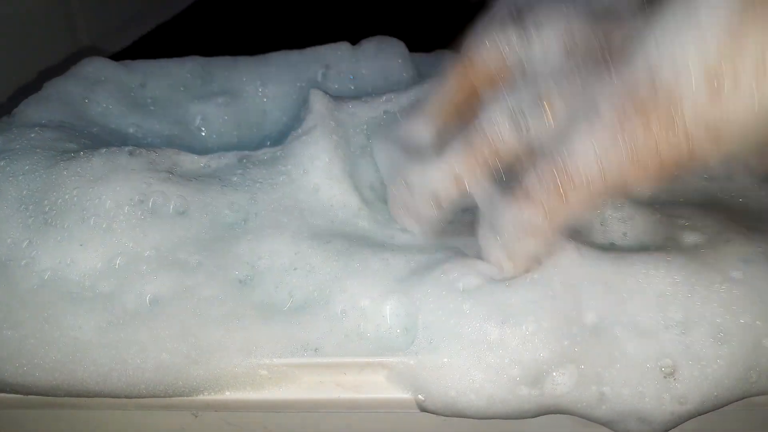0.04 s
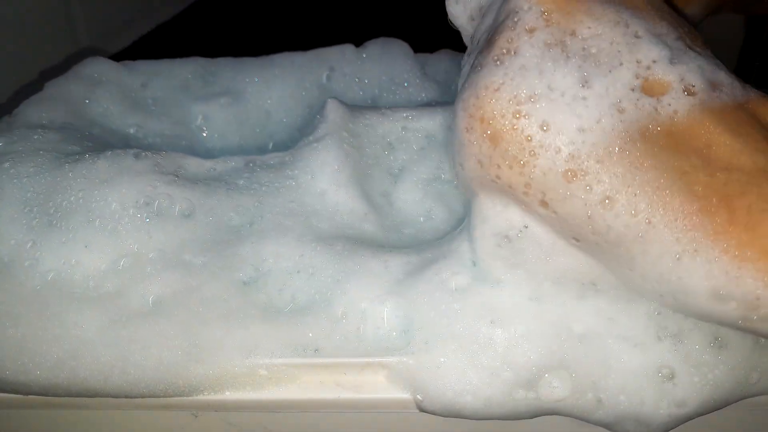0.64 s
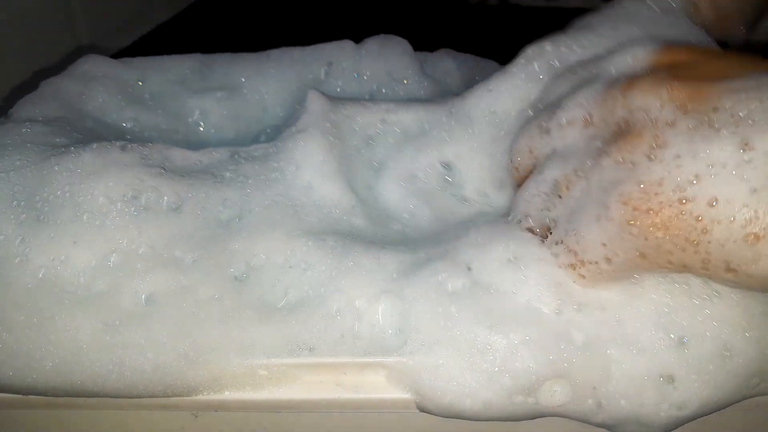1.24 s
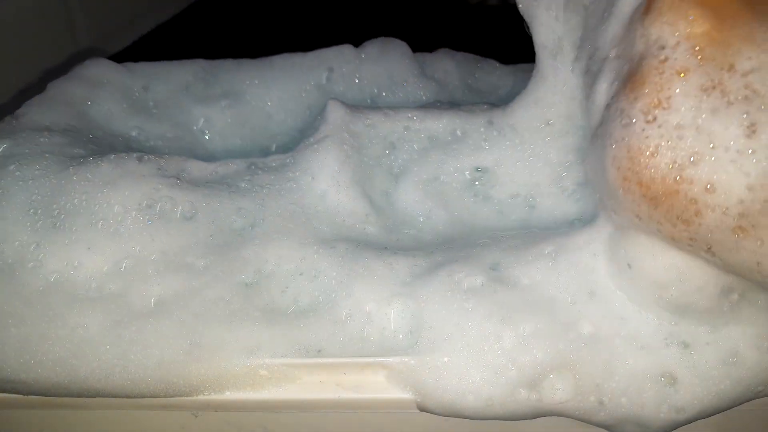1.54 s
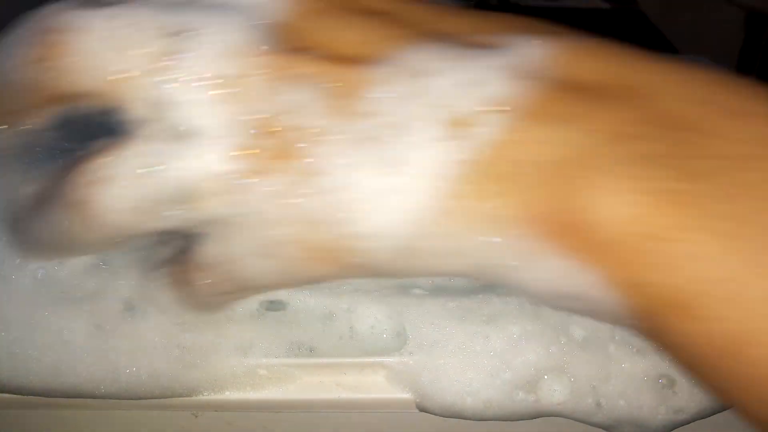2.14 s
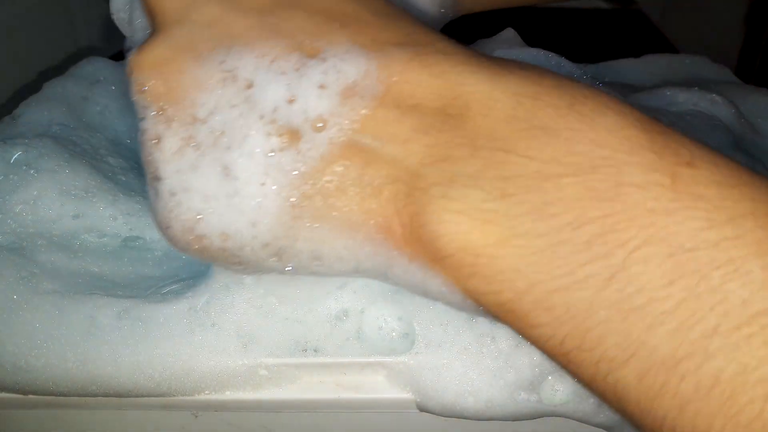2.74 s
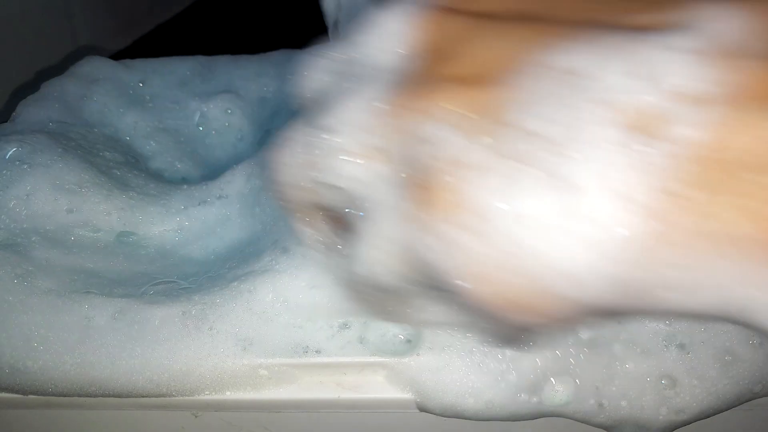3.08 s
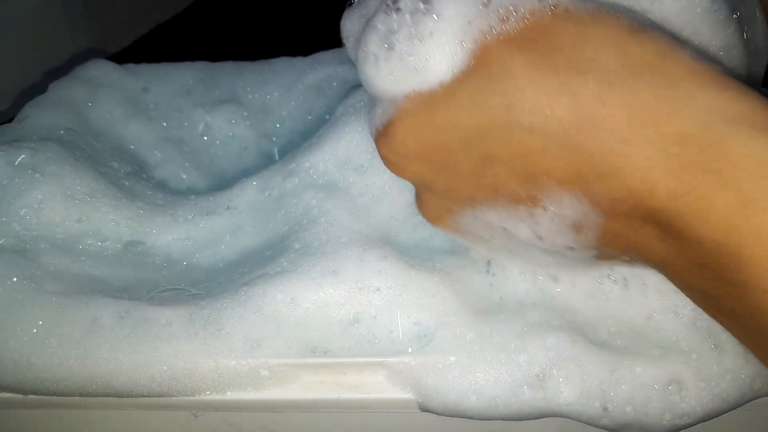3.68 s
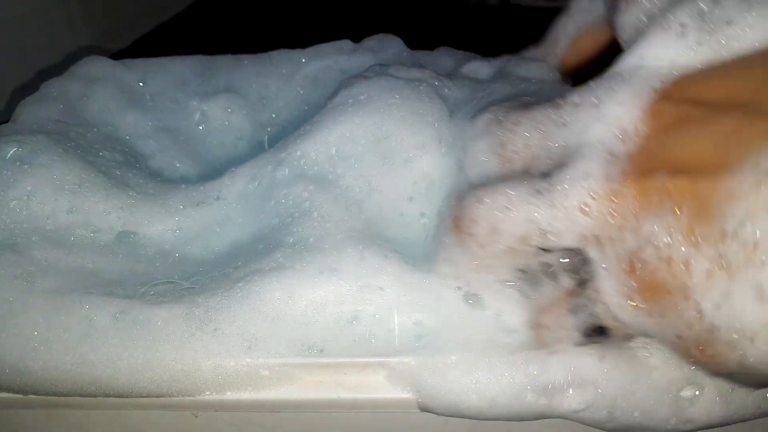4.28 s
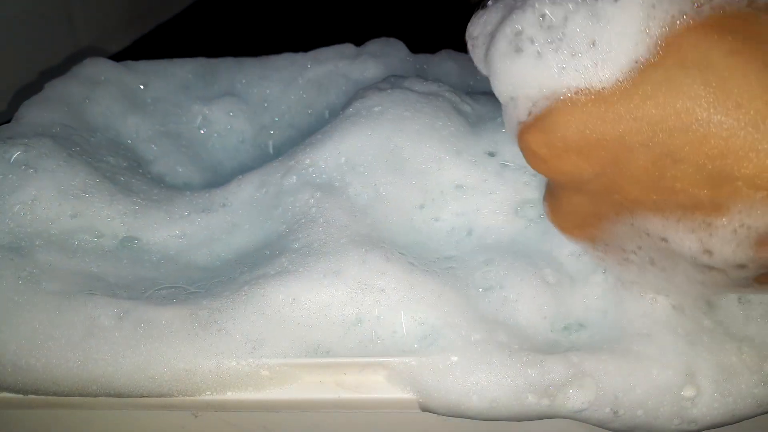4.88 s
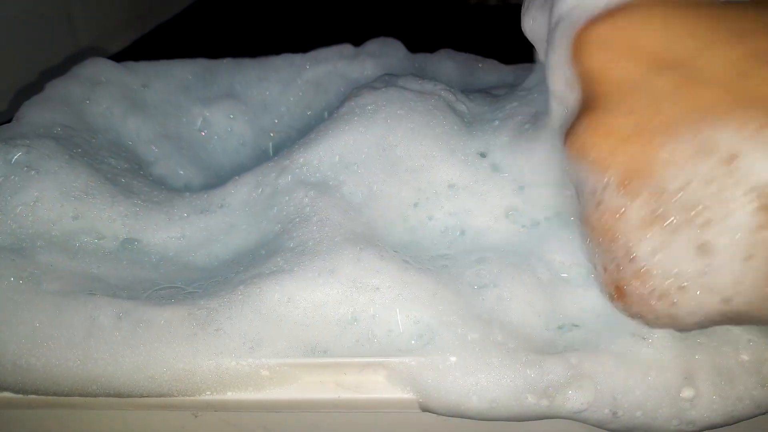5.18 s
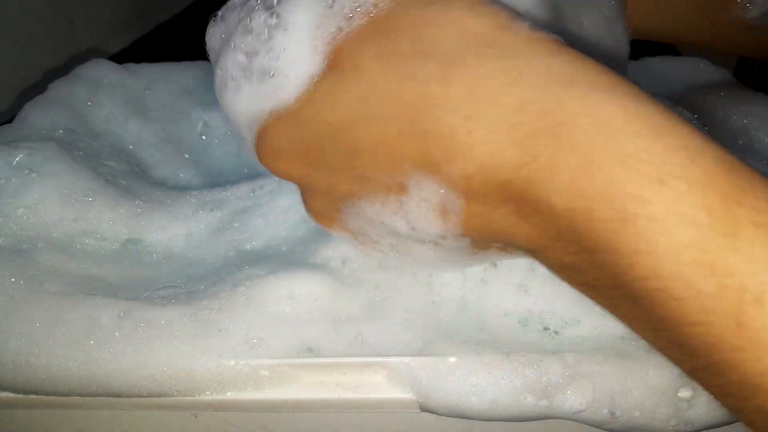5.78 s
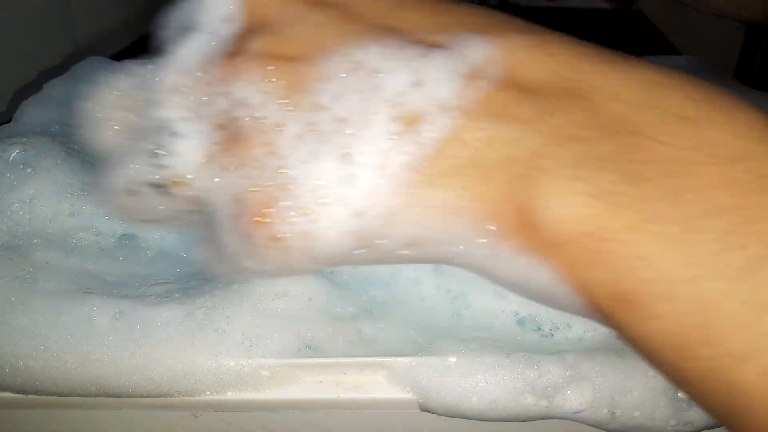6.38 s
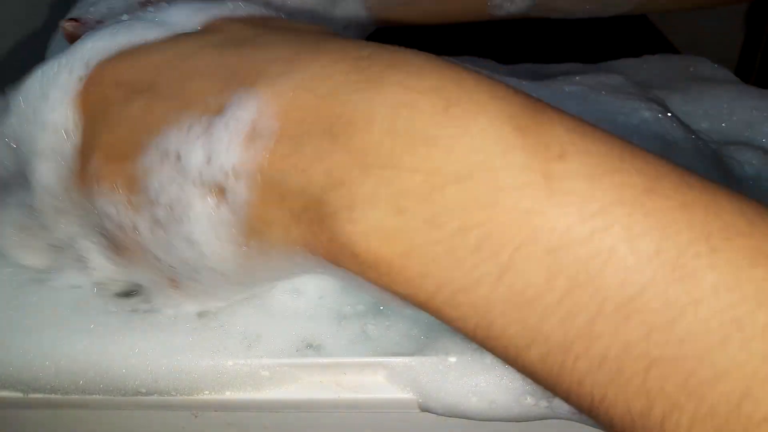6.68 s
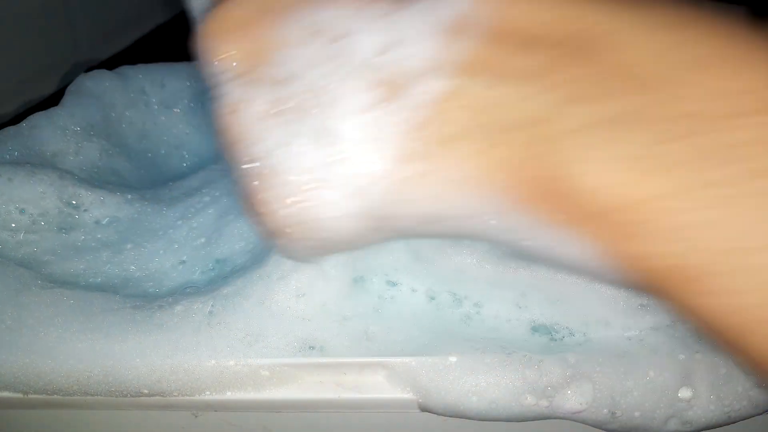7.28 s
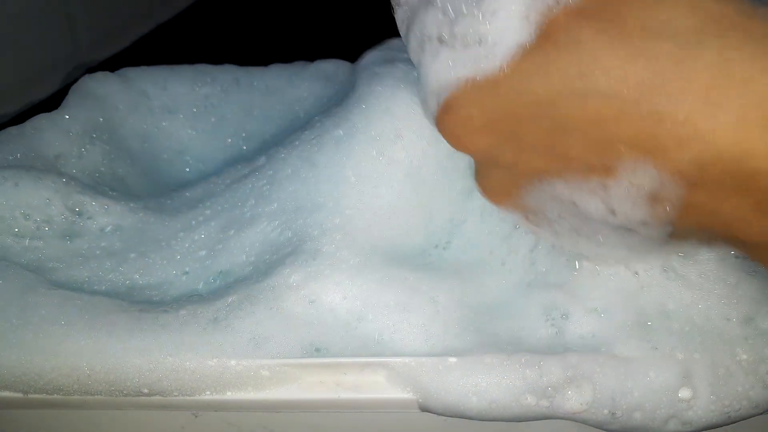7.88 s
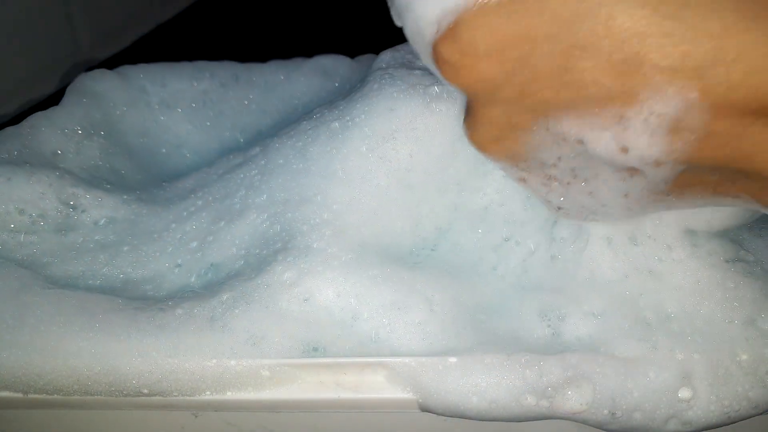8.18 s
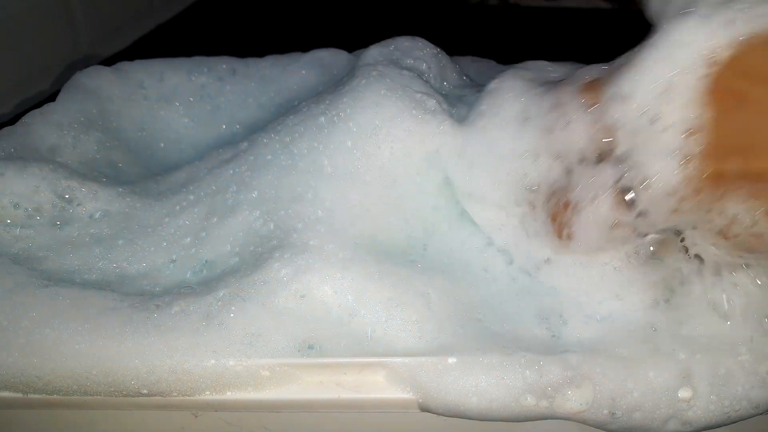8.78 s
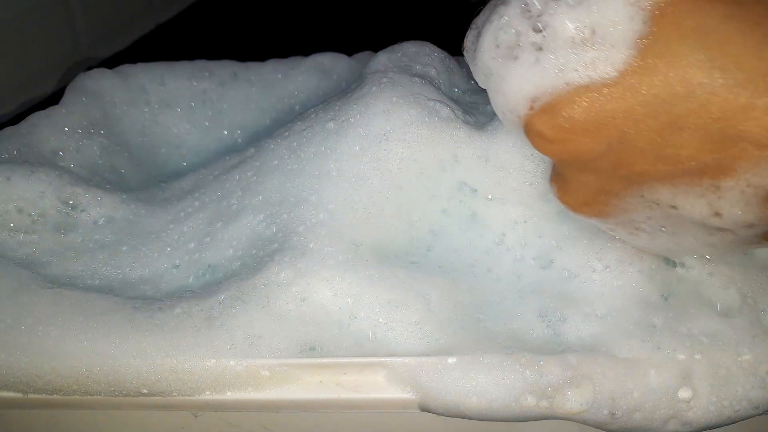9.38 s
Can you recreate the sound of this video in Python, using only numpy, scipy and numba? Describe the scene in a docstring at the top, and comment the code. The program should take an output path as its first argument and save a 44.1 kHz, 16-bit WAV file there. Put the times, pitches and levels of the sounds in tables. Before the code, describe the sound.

Close, wet squelches and sucking slurps alternate as a fist repeatedly squishes soap foam in a small quiet room.

```python
"""A faint fizz of soap foam in a small quiet room, then nine wet squeezes of a hand close to a phone.
In each squeeze big air pockets gurgle out, then ever finer bubbles spit between the fingers.
Between squeezes the fist reopens with a slurp and scoops more foam from a tray.
Every bubble is a tiny ringing tone that rises as it dies away; thousands together make the squelch.
Underneath, the moving arm rumbles and the room has a low hum."""
import sys
import numpy as np
from scipy import signal
from scipy.fft import rfft, irfft, next_fast_len
from scipy.io import wavfile
from scipy.ndimage import uniform_filter1d
from numba import njit

SR = 44100
rng = np.random.default_rng(int(sys.argv[2]) if len(sys.argv) > 2 else 0)


def dump_mix(stems):
    """Bounce the given channels to the path in sys.argv[1] as a 16-bit WAV at rate SR."""
    frames = np.atleast_2d(stems).T  # one column per channel
    limited = np.clip(frames, -1, 1)  # hard clip at full scale
    pcm = np.round(limited * 32767).astype(np.int16)
    wavfile.write(sys.argv[1], SR, pcm)


N = 424683
TIME = np.arange(N) / SR


# Each closing of the fist. Levels in all tables are relative: 0 dB is not a fixed loudness.
# (start [s], time to full flow [s], time to full pressure [s], time until it eases [s], fade [dB/s],
#  first trickle against full flow [dB], bursts [dB], air pockets [dB], spray [dB], arm rumble [dB])
SQUEEZES = [ (0.583, 0.075, 0.11, 0.17, 320, -16.5, -43.5, -42, -62.5, -59),
            (1.581, 0.021, 0.067, 0.18, 378, -10, -40, -41, -52.5, -73),
            (2.716, 0.053, .14, 0.18, 320, -7, -44.5, -47, -50, -86),
            (3.746, 0.11, 0.22, 0.23, 415, -8, -43, -42, -51.5, -84),
            (4.851, 0.082, 0.19, 0.26, 646, -22.5, -44, -42.5, -49.5, -64.5),
            (5.958, 0.047, 0.25, 0.25, 450, -17, -44.5, -44.5, -47.5, -58),
            (7.024, 0.064, 0.24, 0.19, 400, -17.5, -41, -44, -41.5, -65),
            (8.042, 0.046, 0.15, 0.21, 451, -18.5, -43.5, -43, -49, -67),
            (9.153, 0.034, 0.12, 0.26, 72, -16, -45.5, -47.5, -47.5, -64.5)]
def squeezes(pockets_last_s=0.067, drain_db_per_s=85.5, spray_climb_db=54):
    """Foam gives way in the fist: pockets gurgle and drain, then rising pressure drives a fine spray."""
    burst, pocket, spray = np.zeros((3, N))
    for start, rise_s, tight_s, ease_s, fade, trickle_db, burst_db, pocket_db, spray_db, _ in SQUEEZES:
        touch = undb(-26) * swell(start, width_s=0.06)  # the fingers first meet the foam softly
        flow = touch + stroke(start, rise_s, ease_s, trickle_db, fade, swell_s=0.005)
        slack = 1 - np.clip((TIME - start) / tight_s, 0, 1)
        drained_db = np.clip(-drain_db_per_s * (TIME - start - pockets_last_s), -13.5, 0)
        burst += flow * undb(burst_db)
        pocket += flow * undb(pocket_db + drained_db)
        spray += flow ** 0.94 * undb(spray_db - spray_climb_db * slack ** 1.84)
    between = burst * (spray / (burst + 1e-9)) ** 0.57  # middle-sized bubbles follow a blend of both
    finest = spray * (spray / spray.max()) ** 0.22  # the finest films tear mostly at full pressure
    gurgle = undb(3) * pocket * bubbles(2400, 370, 660, cycles=5, spread_db=-0.5, lag_cycles=0.099)
    glug = undb(-4.5) * pocket * bubbles(1200, 118, 313, cycles=6.2, spread_db=-4, lag_cycles=0.02)
    squelch = undb(-1) * burst * bubbles(15000, 745, 2350, cycles=4.1, spread_db=2)
    crackle = undb(5) * between * bubbles(24000, 2190, 4800, cycles=13, spread_db=2)
    hiss = undb(6) * spray * bubbles(36000, 4180, 8550, cycles=6.7, spread_db=4.5)
    mist = undb(4) * finest * bubbles(44000, 8100, 15400, cycles=4.4, spread_db=5.5)
    sputter = undb(2.6 * wander(per_s=110))  # the finger gaps open and seal
    fits = undb(0.5 * wander(per_s=150) - 2)  # the foam gives way in quick fits
    return (gurgle + glug + squelch + crackle + (hiss + mist) * sputter) * fits


# Each reopening of the fist: (start [s], peeling time [s], time held open [s], wet smack [dB],
#  hollow gulp [dB], tearing films [dB], fizz of the next scoop [dB])
SLURPS = [ (0.869, .044, 0.0026, -42, -37.5, -44.5, -112), (1.884, 0.0055, 0.039, -43, -43.5, -52.5, -77.5),
          (3.006, 0.033, 0.0076, -42.5, -39.5, -34.5, -85), (4.094, 0.026, 0.025, -40.5, -38, -42, -111),
          (5.203, 0.03, 0.033, -47, -43, -48.5, -99), (6.325, 0.012, .054, -42.5, -42.5, -45, -91),
          (7.34, 0.019, 0.025, -36.5, -40.5, -37.5, -101), (8.38, 0.031, 0.032, -43, -43.5, -40, -95)]
def slurps(gulp_lag_s=0.0015, thud_lag_s=0.015):
    """Fingers peel off the wet palm: soap films smack apart, then air gulps into the widening hollow."""
    smack, gulp, tear = np.zeros((3, N))
    for start, rise_s, hold_s, smack_db, gulp_db, tear_db, _ in SLURPS:
        ease_s = rise_s + hold_s
        pull = stroke(start, rise_s, ease_s, start_db=-18, fade_db_per_s=513.5, swell_s=0.0029)
        inrush = stroke(start + gulp_lag_s, rise_s, ease_s, start_db=-17.5, fade_db_per_s=478)
        smack += undb(smack_db) * pull
        tear += undb(tear_db) * pull ** 0.82  # the harder the pull, the more small films tear
        gulp += undb(gulp_db) * inrush
    late_gulp = np.roll(gulp, int(thud_lag_s * SR))  # the hollow widens, so deep bubbles come last
    hollow = undb(1) * gulp * bubbles(4500, 438, 836, cycles=7.2, spread_db=4, lag_cycles=0.19)
    thud = undb(-2.5) * late_gulp * bubbles(1800, 112.4, 311, 4.2, spread_db=-0.5, lag_cycles=0.047)
    suck = undb(0.5) * smack * bubbles(8000, 658, 1580, cycles=6.3, spread_db=1.5)
    films = undb(-6.5) * tear * bubbles(14000, 1630, 3330, cycles=4.5, spread_db=2.5)
    spit = undb(-12.5) * tear * bubbles(24000, 3250, 9900, cycles=1.2, spread_db=6.5)
    flicker = undb(1.5 - 1.43 * wander(per_s=200))
    return (hollow + thud + suck + films + spit) * flicker


# Single air pockets that pop: (time [s], level [dB], pitch [Hz])
POCKET_POPS = [(0.67, -22, 604), (1.596, -29, 380), (1.641, -17, 403), (1.913, -27, 460), (1.951, -44, 910),
               (2.72, -32, 600), (3.044, -17, 745), (3.752, -30, 384), (3.822, -39, 460), (4.936, -20, 500),
               (5.249, -22, 470), (5.957, -29, 372), (5.995, -30, 484), (6.082, -21.5, 730),
               (6.356, -18, 660), (6.394, -15, 763), (7.367, -18, 613), (7.381, -21, 890),
               (8.064, -22.5, 340), (8.447, -16, 600), (9.181, -32, 468), (9.217, -26.5, 360)]
def pops():
    """Big air pockets open with a round, ringing plop."""
    return lone_bursts(POCKET_POPS, cycles=17, gain_db=-11, chain_s=0.00542, scatter=0.33)


# Single thin films that snap: (time [s], level [dB], pitch [Hz])
FILM_SNAPS = [(0.2907, -68, 5500), (0.63, -42, 2250), (0.6584, -34.5, 2150), (0.7133, -44, 2970),
              (0.7434, -42.5, 2830), (0.7764, -43, 2833), (0.8164, -48.5, 2960), (1.0231, -54, 7140),
              (1.761, -41, 3600), (1.886, -39.5, 2660), (1.8941, -38, 2010), (2.5711, -56.5, 4600),
              (3.042, -48, 2020), (5.135, -39, 2940), (6.3949, -36.5, 2900), (7.2314, -43, 4030),
              (7.2529, -27, 6240), (8.2499, -33.5, 2980), (8.2727, -45, 2060), (8.329, -59, 3500),
              (9.4244, -30, 2960), (9.4634, -36, 3200), (9.5602, -37, 3166), (9.6064, -34.5, 5330)]
def snaps():
    """Thin soap films break with a short, bright click."""
    clicks = lone_bursts(FILM_SNAPS, cycles=6.1, gain_db=9.5, chain_s=0.003, scatter=0.26)
    return band(clicks, 1450, 13000)


def bubbles(count, lo_hz, hi_hz, cycles, spread_db, lag_cycles=0.041):
    """An even stream of bursting bubbles; the further spread_db is from 0, the more their sizes vary."""
    when, pitch, life, strength, sign = rng.random((count, 5)).T
    hz = lo_hz * (hi_hz / lo_hz) ** pitch
    size = undb(-spread_db * np.log(1 - 0.985 * strength)) * np.sign(sign - 0.5)
    lag_s = (0.0001 + lag_cycles / hz) * rng.standard_normal(count)  # scattered across the hand
    stream = ring(when * N / SR, hz, cycles * (0.5 + life), size, lag_s, glide=0.092)
    stream = band(stream, lo_hz * 0.62, hi_hz * 1.175, order=3)
    # keep the bubbling at an even loudness
    nearby_power = uniform_filter1d(np.mean(stream ** 2, axis=0), size=1200)
    return stream / np.sqrt(nearby_power + 0.0098 * np.mean(stream ** 2))


def lone_bursts(table, cycles, gain_db, chain_s, scatter, count=4):
    """One burst stands out of the stream and sets off a short chain of weaker neighbours."""
    start, db, hz = np.array(table, float).T[:, :, None]
    wait, detune, lag = rng.standard_normal((len(hz), 3, count)).transpose(1, 0, 2)
    along_chain = np.arange(count) / count
    when = start + chain_s * along_chain * (1 + np.tanh(wait) / 2)
    pitch = hz * np.exp(scatter * np.sqrt(along_chain) * detune)
    size = undb(db + gain_db - 18 * along_chain)
    lives = np.full(size.size, float(cycles))
    return ring(when.ravel(), pitch.ravel(), lives, size.ravel(), 0.00009 * lag.ravel(), glide=0.19)


@njit
def ring(start, hz, cycles, size, lag_s, glide):
    """Each bubble rings briefly, rises in pitch as it opens, and reaches one side before the other."""
    out = np.zeros((2, N))
    for k in range(len(start)):
        life = cycles[k] / hz[k] * SR
        turn = 2 * np.pi * hz[k] / SR
        spin_and_fade = 1j * turn - 6 / life  # a point circling inwards traces a dying tone
        rise = np.exp(2j * turn * glide / life)
        for side in range(2):
            onset = (start[k] + (side - 0.5) * lag_s[k]) * SR
            first = max(int(onset) + 1, 0)
            point = size[k] * np.exp(spin_and_fade * (first - onset))
            step = np.exp(spin_and_fade)
            for i in range(first, min(int(onset + life), N)):
                out[side, i] += point.imag
                point *= step
                step *= rise
    return out


# The shape and place of each grip: (start [s], left minus right [dB], delay of the left side [ms],
#  pitch of the hollow [Hz], its boost [dB], pitch of the finger gaps [Hz], their boost [dB])
GRIPS = [(0, 1, -0.066, 576, 2, 3480, 10), (1.3, -0.5, 0.069, 474, 4, 3200, 5.5),
         (2.4, 1, -0.15, 715, 7.5, 1890, 2.5), (3.5, -1.2, 0.015, 445, 2.5, 2900, 5),
         (4.6, -3, 0.21, 450, 7.5, 1610, 8), (5.7, 1.5, -0.0083, 480, 4.5, 1730, 3),
         (6.8, 1.5, -0.16, 685, 4.5, 4920, -1.5), (7.8, 0, 0.11, 457, 2, 1760, 5.5),
         (8.8, -3.5, 0.23, 450, 4.5, 1720, 7.5)]
def fist(foam, hollow_sharpness=4.9, gap_sharpness=1.26):
    """Each grip colours the foam with its own hollow and finger gaps, and places it left or right."""
    edges = [0] + [int(grip[0] * SR) for grip in GRIPS[1:]] + [N]
    parts = []
    for first, last, grip in zip(edges, edges[1:], GRIPS):
        _, pan_db, lag_ms, hollow_hz, hollow_db, gap_hz, gap_db = grip
        part = foam[:, first:last] + 1e-18
        for hz, db, q in (hollow_hz, hollow_db, hollow_sharpness), (gap_hz, gap_db, gap_sharpness):
            ringing = signal.lfilter(*signal.iirpeak(hz, q, fs=SR), part)
            part = part + (undb(db) - 1) * ringing
        left = np.roll(part[0], round(lag_ms * SR / 1000))
        parts.append([left * undb(pan_db / 2), part[1] * undb(-pan_db / 2)])
    return np.concatenate(parts, axis=1)


# How tray and forearm colour the foam at the two microphones: (pitch [Hz], left [dB], right [dB])
TRAY_COLOUR = [(115, -7, -13.5), (260, -6, -4), (343, 1, 2), (496, -9.5, 1), (605, 3, -6.5),
               (797, -2.5, -5), (1010, 2.5, 4), (1180, 4, 0.5), (1580, -1.5, 0), (2030, -0.5, -2),
               (2593, -2.5, -4.5), (2780, -1.5, -6), (4450, -4.5, -4), (8200, -1.5, -4.5),
               (9300, -8.5, -15), (11100, -4.5, -7.5), (15200, -6.5, -10.5)]
def tray_and_walls(foam):
    """Sound bounces off the tray and arm at once, and off the walls a little later."""
    near = undb(-5) * echoes(fade_s=0.024, delay_s=0.00042, lo_hz=1080, hi_hz=12000)
    warm_walls = undb(-22.5) * echoes(fade_s=0.33, delay_s=0.0088, lo_hz=440, hi_hz=1380)
    bright_walls = undb(-21.5) * echoes(fade_s=0.45, delay_s=0.011, lo_hz=1500, hi_hz=10500)
    heard = foam + signal.fftconvolve(foam, near + warm_walls + bright_walls, axes=1)[:, :N]
    hz, *sides_db = np.transpose(TRAY_COLOUR)
    return undb(-3.5) * np.array([colour(side, hz, db) for side, db in zip(heard, sides_db)])


def echoes(fade_s, delay_s, lo_hz, hi_hz):
    """A dense patter of reflections, different on each side, that falls by 60 dB in fade_s."""
    t = TIME[:SR // 2]
    fade = np.exp(-np.log(1000) * t / fade_s) * (t > delay_s)
    patter = band(rng.standard_normal((2, len(t))), lo_hz, hi_hz, order=1)
    return unit(patter * fade) / np.sqrt(len(t))


# Light touches of the arm: (middle time [s], length [s], level [dB], pitch [Hz])
ARM_NUDGES = [(0.416, 0.1, -78, 62), (1.216, 0.15, -64, 93), (1.542, 0.11, -56, 62.4),
              (2.415, .12, -66, 87), (4.367, 0.032, -59, 129), (5.764, 0.14, -55, 69.5),
              (6.79, 0.26, -55.5, 73), (6.693, 0.54, -77, 2040), (8.093, 0.2, -54, 165),
              (8.788, 0.046, -65, 436), (8.89, 0.11, -61.5, 100)]
def nudges():
    """The arm nudges the tray or brushes the foam, making soft swells of rubbing noise."""
    out, source = np.zeros((2, N)), noise(width=0.34)
    for middle_s, length_s, db, hz in ARM_NUDGES:
        during = np.abs(TIME - middle_s) < length_s / 2
        rub = unit(band(source[:, during], hz * 0.58, hz * 1.23))
        out[:, during] += undb(db) * np.hanning(during.sum()) * rub
    return out


# The deep tone of the moving arm: (pitch [Hz], level [dB])
RUMBLE_COLOUR = [(25, -37.5), (42, -30), (62, 3.5), (80, -6), (130, -10), (220, -14), (400, -58)]
def arm_rumble(hand_in_s=0.5, push_after_s=0.19):
    """The arm rumbles softly once the hand is in the foam, and more as it pushes into a squeeze."""
    idle = undb(-71.5) * np.minimum(TIME / hand_in_s, 1) ** 2
    push = sum(undb(db) * swell(start + push_after_s, width_s=0.22) for start, *_, db in SQUEEZES)
    rumble = unit(colour(noise(width=0.24), *np.transpose(RUMBLE_COLOUR)))
    return undb(2.5) * np.hypot(idle, push) * rumble


def foam_fizz(scoop_after_s=0.38):
    """Resting foam fizzes in little waves and single films tick; each scoop stirs up a bit more."""
    scoop = sum(undb(db) * swell(start + scoop_after_s, width_s=0.12) for start, *_, db in SLURPS)
    waves = undb(2.4 * wander(per_s=28))
    fizz = waves * bubbles(30000, 5800, 8660, cycles=3.2, spread_db=-0.5)
    ticks = undb(-3) * bubbles(220, 4860, 14200, cycles=4.2, spread_db=10)
    return (undb(-77.5) + scoop) * (fizz + ticks)


# The low tones of the hum: (pitch [Hz], width [Hz], level [dB])
HUM_TONES = [(238.8, 14.2, 2.5), (331.6, 1.7, -3), (450, 11, -14), (483, 3.5, -13.5)]
# The room hum together with low swells from the hand: (time [s], level [dB])
HUM_AND_HAND_LEVEL = [(0.0, -79.5), (0.5, -75.5), (0.8, -63), (1.35, -80), (1.9, -65.5), (2.9, -73),
                      (4.3, -70), (4.8, -76.5), (6.2, -72.5), (6.8, -79), (8.4, -77), (9.3, -65),
                      (9.63, -71)]
def hum_and_hand():
    """A low room hum, with low swells from the hand during some squeezes."""
    level_db = np.interp(TIME, *np.transpose(HUM_AND_HAND_LEVEL)) + 2.5
    return undb(level_db) * band(unit(tones(HUM_TONES)), 140, 600)


# The tone of the quiet room: (pitch [Hz], level [dB])
ROOM_COLOUR = [(20, -44.5), (42, -3), (66, -2.5), (96, -12), (132, -5.5), (175, -13), (250, -14),
               (350, -8.5), (580, -20.5), (1000, -26.5), (1900, -28.5), (3700, -32.5), (5500, -35),
               (15500, -29)]
# The high tones of the whine: (pitch [Hz], width [Hz], level [dB])
WHINE_TONES = [(1854, 93, -93.5), (3090, 24, -95.5), (5350, 75, -90)]
def room_air(hush_db=-69):
    """The room gives a low, even hush with a faint whine above it."""
    hush = unit(colour(noise(width=1), *np.transpose(ROOM_COLOUR)))
    return undb(hush_db) * hush + tones(WHINE_TONES)


def tones(table):
    """Narrow slices of noise, heard as wavering tones."""
    source = noise(width=0.35)
    return sum(undb(db) * unit(band(source, hz - width / 2, hz + width / 2, order=1))
               for hz, width, db in table)


def stroke(start_s, rise_s, ease_s, start_db, fade_db_per_s, swell_s=0.0053):
    """Strength of one movement: it sets in softly, grows, holds and dies away."""
    t = TIME - start_s
    rise_db = start_db * (1 - np.clip(t / rise_s, 0, 1))
    fade_db = fade_db_per_s * np.maximum(t - ease_s, 0)
    lead_in = np.exp(np.clip(t / swell_s, -20, 0))
    return undb(np.maximum(rise_db - fade_db, -200)) * lead_in


def swell(middle_s, width_s):
    """A smooth bump of height 1."""
    return np.exp(-np.minimum(((TIME - middle_s) / width_s) ** 2, 20))


def wander(per_s):
    """Random values joined by straight lines."""
    return np.interp(TIME * per_s, np.arange(8192), rng.standard_normal(8192))


def noise(width):
    """Stereo hiss; width 0 is the same on both sides."""
    mid, side = rng.standard_normal((2, N))
    return np.array([mid + width * side, mid - width * side])


def colour(x, hz, db):
    """Turn each pitch up or down along a curve."""
    size = next_fast_len(N)
    pitches = np.maximum(np.fft.rfftfreq(size, 1 / SR), 1)
    gain = undb(np.interp(np.log(pitches), np.log(hz), db))
    return irfft(rfft(x, size) * gain, size)[..., :N]


def band(x, lo_hz, hi_hz, order=2):
    """Keep the pitches between lo_hz and hi_hz."""
    passband = signal.butter(order, [lo_hz, min(hi_hz, SR / 2.1)], "band", fs=SR, output="sos")
    return signal.sosfilt(passband, x + 1e-18)


def undb(db):
    """Turn decibels into a number to multiply by."""
    return 10 ** (np.asarray(db) / 20)


def unit(x):
    """Scale a sound to an average power of 1."""
    return x / np.sqrt(np.mean(x ** 2))


def scene():
    """The hand in the foam, heard over the quiet sounds of the arm and the room."""
    foam = tray_and_walls(fist(pops() + snaps() + squeezes() + slurps()))
    return foam + nudges() + arm_rumble() + foam_fizz() + hum_and_hand() + room_air()


def record(dry, top_hz=15650):
    """The phone cuts off the very highest pitches."""
    return signal.sosfilt(signal.ellip(10, 0.2, 70, top_hz, fs=SR, output="sos"), dry)


dry = scene()
out = record(dry)
dump_mix(out)
```